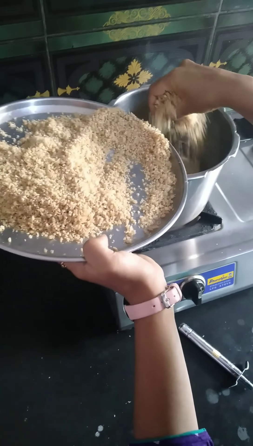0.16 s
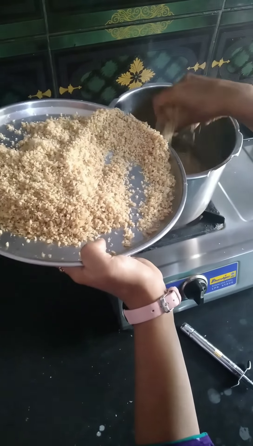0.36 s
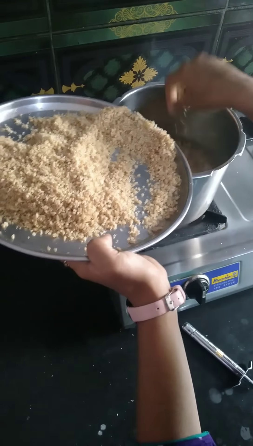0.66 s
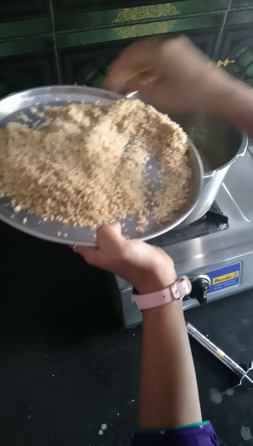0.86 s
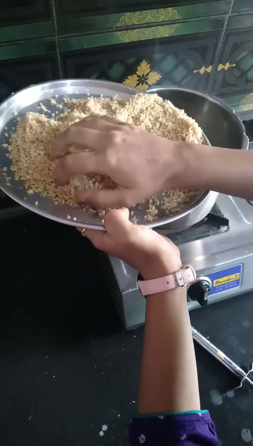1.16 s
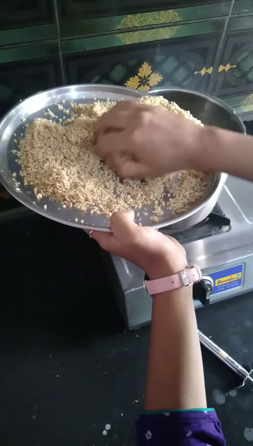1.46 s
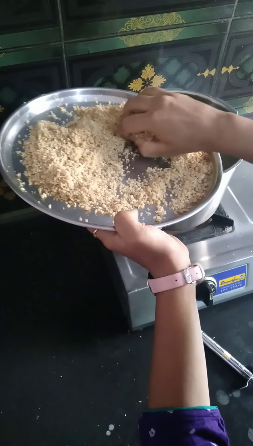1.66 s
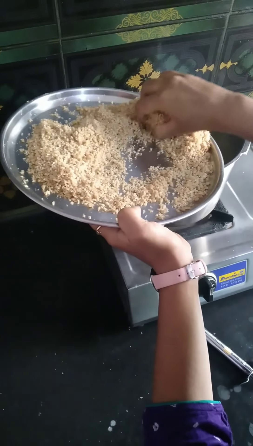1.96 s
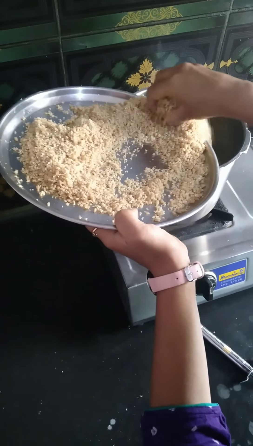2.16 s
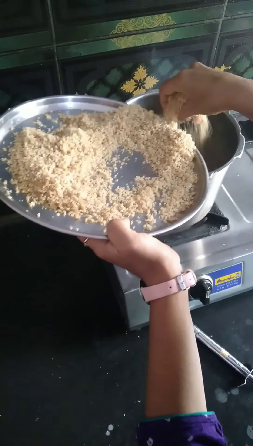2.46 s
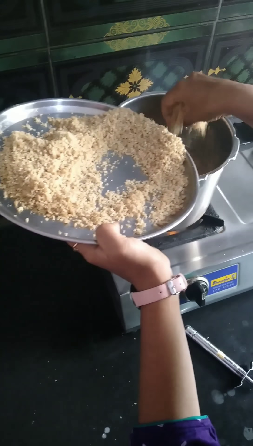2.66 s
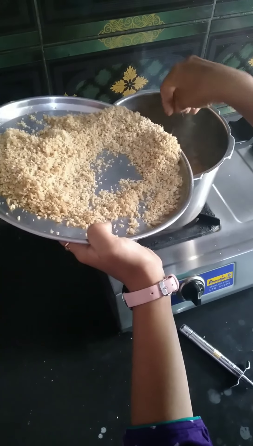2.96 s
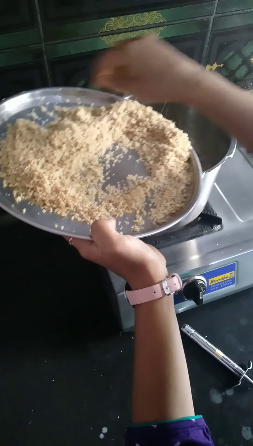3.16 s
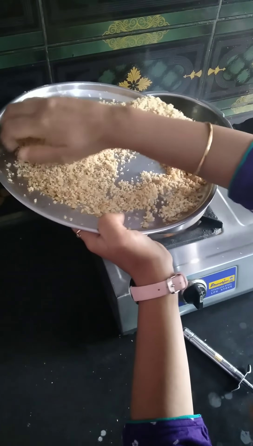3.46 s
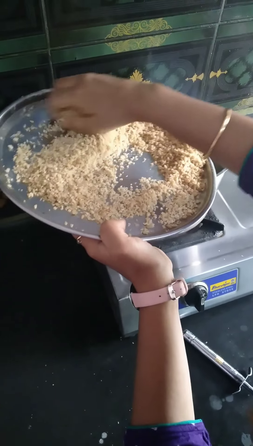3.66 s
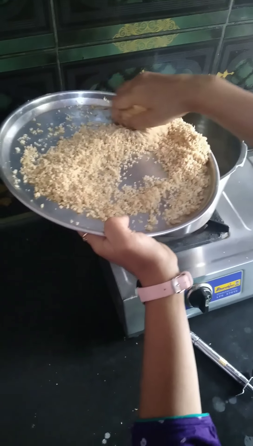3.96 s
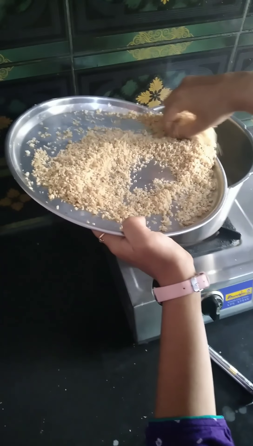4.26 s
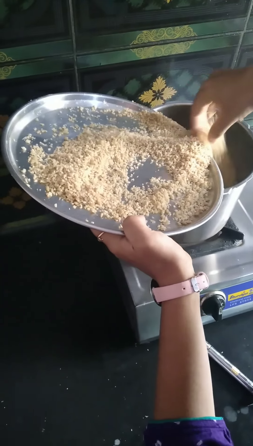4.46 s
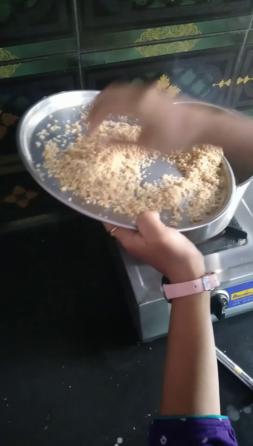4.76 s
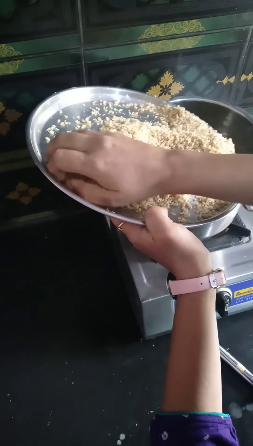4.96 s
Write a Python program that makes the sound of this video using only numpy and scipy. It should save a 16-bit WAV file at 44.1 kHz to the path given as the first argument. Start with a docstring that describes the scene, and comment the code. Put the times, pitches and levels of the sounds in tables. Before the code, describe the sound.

Gritty grain rushes and splashes into a steel pot in three bursts, with finger rakes, dull thuds and hard clanks between.

```python
"""Coarse wheat is pushed by hand off a steel plate into a cooker of warm water, in a small tiled kitchen.
0 s: first handful, random grain impacts with bubbles, then a knock; finger rakes; a deep drone until 2.3 s.
2.2 s: second handful, with plops and soft knocks; then more rakes. Faint narrow noise bands glide at times.
4.2 s: plops, the short third handful, and the hardest knocks, as decaying modes of plate and rim.
Throughout: grains shifting on the plate, a wavering hum of sines, filtered-noise rumble and hiss."""
import sys
import numpy as np
from scipy import signal
from scipy.fft import rfft, irfft
from scipy.io import wavfile

SR = 44100
rng = np.random.default_rng(int(sys.argv[2]) if len(sys.argv) > 2 else 0)


def digitize_waveform(pressure):
    """Quantize a signal to 16-bit integers and store it at the path in sys.argv[1].

    Rows of a 2-D input are taken as channels; values are limited to [-1, 1].
    """
    field = np.atleast_2d(pressure).T
    bounded = np.clip(field, -1, 1)
    quanta = np.round(bounded * 32767).astype(np.int16)
    wavfile.write(sys.argv[1], SR, quanta)


N = 225457
TIME = np.arange(N) / SR
TAIL = np.arange(SR // 2) / SR


# dry ticks of single grains: f/Hz, relative level/dB
GRAIN_SPECTRUM = [(2500, -17.5), (4500, -12.5), (6000, -7), (7300, -5), (8500, -1), (9400, -6), (10500, -9),
                  (12000, -12), (16000, -22.5)]
# duller patter of clumps: f/Hz, relative level/dB
PATTER_SPECTRUM = [(1500, -19), (2300, -6.5), (3200, -6), (4200, -3), (6000, -11), (8000, -20.5)]
# wheat hitting the water: f/Hz, relative level/dB
SPLASH_SPECTRUM = [(250, 4.5), (400, -4.5), (540, 12), (720, 3.5), (1150, 5.5), (1600, 5), (2200, -10.5),
                   (3200, -6.5)]
# clumps that drop at once: middle t/s, half length/s, relative level/dB
CLUMP_DROPS = [(0.17, 0.028, -44), (0.625, 0.092, -34), (2.25, 0.025, -30.5), (2.9, 0.066, -37),
               (4.175, 0.023, -38.5), (4.245, 0.06, -33), (4.63, 0.13, -40.5)]
# fingers raking through the heap: middle t/s, half length/s, relative level/dB
FINGER_RAKES = [(1.3, 0.065, -57), (1.563, 0.07, -45), (2.002, 0.1, -47.5), (3.655, 0.087, -46.5),
                (3.745, 0.054, -38), (3.85, 0.044, -36.5), (4.11, .025, -45), (4.006, 0.16, -48),
                (5.102, 0.051, -52)]


def wheat(shifting_db=-62.5, patters_per_tick=0.4, patter_db=-5, clump_patter_db=-3, rake_patter_db=-15,
          splash_db=-9.5, patter_waver_db=-0.9, splash_waver_db=-0.5):
    """A stronger flow brings more grains; they tick, patter in clumps, splash and trap bubbles."""
    poured = stream()
    clumps = swells(CLUMP_DROPS)
    # some grains keep shifting on the tilted plate
    raked = np.hypot(swells(FINGER_RAKES), undb(shifting_db))
    flow_db = 10 * np.log10(poured ** 2 + clumps ** 2 + raked ** 2)
    per_s = 6000 * undb(.5 * (np.minimum(flow_db, -28) + 32.5))

    # falling grains land hard; grains only pushed about lack the highest treble
    falling = np.clip((flow_db + 47.5) / 14, 0, 1)
    ticks = unit(colour(grains(per_s, 3.2), GRAIN_SPECTRUM))
    soft = signal.sosfiltfilt(signal.butter(8, 10500, fs=SR, output="sos"), ticks)
    ticks = (soft + falling * (ticks - soft)) * undb(flow_db)

    patter_power = (undb(patter_db) * poured) ** 2
    patter_power += (undb(clump_patter_db) * clumps) ** 2
    patter_power += (undb(rake_patter_db) * raked) ** 2
    patter = unit(colour(grains(per_s * patters_per_tick, 1.7), PATTER_SPECTRUM)) + undb(-10.0) * fizz()
    patter = patter * np.sqrt(patter_power) * undb(patter_waver_db * walk(33.0))

    splash = unit(colour(ports(grains(per_s, 3.7), 1100), SPLASH_SPECTRUM))
    splash = splash * np.hypot(poured, undb(-2) * clumps) * undb(splash_db + splash_waver_db * walk(27.12))
    return spurts() * (pan(ticks, -0.49) + pan(patter + splash, 1.4))


# handfuls off the plate: full flow from t/s, until t/s, relative level/dB, thinning/(dB/s)
POURED_HANDFULS = [(0.0, 0.466, -30, 6), (2.163, 2.9, -31, 6), (4.357, 4.51, -29.5, -8.5)]


def stream(rise_db_per_s=128, trail_db_per_s=78):
    """Gain of the pour: each handful starts quickly, thins (builds, if negative) and trails off."""
    out = np.zeros(N)
    for start, end, db, thinning_db_per_s in POURED_HANDFULS:
        early = np.maximum(start - TIME, 0)
        held = np.clip(TIME - start, 0, end - start)
        late = np.maximum(TIME - end, 0)
        out += undb(db - rise_db_per_s * early - thinning_db_per_s * held - trail_db_per_s * late)
    return out


def swells(rows):
    """Gain of bell-shaped swells, one per row, summed in power."""
    return np.sqrt(sum(undb(2 * db) / (1 + ((TIME - s) / half_s) ** 2 / 3) ** 4 for s, half_s, db in rows))


def grains(per_s, spread_db):
    """Random impacts of unequal size; each reaches one microphone up to 20 samples before the other."""
    at = np.flatnonzero(rng.random(N) < per_s / SR)
    sign_draw, size_draw, lag_draw = rng.random((N, 3))[at].T
    hits = np.sign(sign_draw - .5) * undb(spread_db * np.minimum(-np.log(1 - size_draw), 5))
    lag = (40 * (lag_draw - .5)).astype(int)
    out = np.zeros((2, N))
    out[0, at] = hits
    out[1, (at + lag) % N] = hits
    return unit(out / np.sqrt(per_s))  # density does not set the level


def spurts(per_s=55, t60=0.2, size=0.24):
    """Sticky grains let go in little avalanches, each with a sudden start and a quick decay."""
    starts = (rng.random(N) < per_s / SR) * np.minimum(rng.exponential(size=N), 3)
    return unit(1 + size * convolve(starts, fade(t60))[0])


def fizz(count=1500, cycles=90):
    """Small bubbles of all sizes, carried under by the grains."""
    out = np.zeros((2, N))
    for when, pitch, size, left, right in rng.random((count, 5)):
        hz = 1700 * 3 ** pitch
        sides = np.array([[left], [right]]) - .5
        add(out, when * N / SR, undb(20 * size) * sides * bubble(hz, cycles / hz))
    return unit(out)


def bubble(hz, t60, glide=0.54):
    """A trapped bubble starts within two cycles, rings and rises in pitch."""
    t = TAIL[:SR // 16]
    decay = np.exp(-np.log(1000) * t / t60)
    return np.minimum(hz * t / 2, 1) * decay * np.sin(2 * np.pi * hz * t * (1 + glide * t))


def cooker_wall(x, scatter_db=6.0, t60=0.03, count=6):
    """Sound bounces between the steep steel walls, differently for each place where the grains land."""
    shares = np.array([walk(45) for _ in range(count)])
    out = np.zeros((2, N))
    for share in shares / np.sqrt(np.sum(shares ** 2, axis=0)):
        out += convolve(x * share, unit_energy(noise(len(TAIL)) * fade(t60)))
    return (x + undb(scatter_db) * out) / np.hypot(1, undb(scatter_db))


def wall_strikes(db=-9.5):
    """A few grains of each pour strike the bare steel near the top and are heard directly."""
    strikes = unit(colour(grains(420, 1.5), GRAIN_SPECTRUM))
    return undb(db) * strikes * np.hypot(stream(), swells(CLUMP_DROPS))


def pings(count=1400, ping_hz=8500, spread_octaves=0.14, db=-7, t60=.005, spread_db=3.5):
    """Single grains tick on the steel, each at the pitch of the spot where it lands."""
    out = np.zeros((2, N))
    starts = rng.random(count) * N / SR
    draws = np.clip(rng.standard_normal((count, 4)), -1.5, 1.5)
    for s, (pitch, size, left, right) in zip(starts, draws):
        ping = bubble(ping_hz * 2 ** (spread_octaves * pitch), t60, glide=0)  # steady pitch
        add(out, s, undb(spread_db * size) * np.array([[left], [right]]) * ping)
    return undb(db) * unit(out) * np.hypot(stream(), swells(CLUMP_DROPS))


# little clumps of grains on steel: t/s, relative level/dB, contact corner f/Hz
STRAY_CLUMPS = [(0.004, -25, 14000), (0.065, -30, 14000), (0.078, -24, 14000), (0.136, -25, 12000),
                (0.308, -31, 11000), (0.598, -29, 12100), (0.609, -21.5, 14000), (.641, -25, 14000),
                (0.788, -33.5, 12000), (0.902, -51, 9500), (1.117, -25.5, 11300), (2.002, -34.5, 9500),
                (2.096, -44, 9500), (2.138, -38, 11000), (2.176, -26, 14000), (2.237, -34, 14000),
                (2.369, -33, 11000), (2.402, -25.5, 14100), (2.471, -28, 11000), (2.534, -32, 12000),
                (2.807, -38, 12000), (2.869, -45, 12000), (2.9, -23.5, 14100), (3.731, -43, 11000),
                (3.821, -30.5, 12000), (3.836, -31, 12200), (3.932, -39, 9500), (4.085, -31, 9200),
                (4.148, -32, 11800), (4.196, -27, 12000), (4.205, -33, 12000), (4.25, -39, 12100),
                (4.308, -25, 12000), (4.522, -34, 14000)]


def stray_grains(burst_s=0.0033):
    """A little clump lands within a few milliseconds, then its grains scatter over the steel."""
    out = np.zeros((2, N))
    for s, db, corner_hz in STRAY_CLUMPS:
        landing = np.exp(-2 * (TAIL / burst_s - 1) ** 2)
        sizes_db = 2.5 * np.interp(TAIL * 900, np.arange(512), rng.standard_normal(512))
        scatter = 0.3 * fade(0.27) * unit(undb(sizes_db))
        clump = unit_energy(colour(noise(len(TAIL)) * (landing + scatter), GRAIN_SPECTRUM))
        add(out, s, undb(db + 21.5) * contact(clump, corner_hz, order=6))
    return out


# clumps in the water: t/s, f/Hz at the start, relative level/dB, t60/s
WATER_PLOPS = [(0.14, 1384, -35.5, 0.13), (2.185, 1985, -24.5, 0.039), (2.246, 2570, -24, .05),
               (2.41, 1146, -34.5, 0.2), (4.198, 2150, -20, 0.043), (4.195, 2520, -25, .04),
               (4.205, 2350, -16, 0.044), (4.222, 2170, -34, .03)]


def plops():
    """Clumps trap a few larger pockets of air."""
    out = np.zeros((2, N))
    for s, hz, db, t60 in WATER_PLOPS:
        add(out, s, undb(db) * bubble(hz, t60))
    return out


# plate against cooker: t/s, relative level/dB, contact corner f/Hz (higher is harder), click level/dB re blow
RIM_KNOCKS = [(0.3767, -24.5, 1490, -26), (1.9105, -22, 2360, -13), (2.905, -42, 700, -33),
              (2.946, -34, 900, -25), (4.325, -12.5, 2900, -6), (4.611, -23.5, 1490, -9),
              (4.655, -26, 1170, -21), (4.835, -12.5, 2930, -5.5)]
# modes of plate and cooker: f/Hz, relative level/dB, t60/s
STEEL_MODES = [(222.6, -16.5, 0.56), (242, -9.5, 0.52), (464, -6, 0.62), (505.4, 6.5, 0.27), (534, 4, 0.54),
               (566.7, 7, 0.23), (698, -18, 0.57), (780, -10.5, 0.43), (883, -16, 0.69), (923, 10, 0.085),
               (1023, -10, 0.5), (1230, 1.5, 0.34), (1505, 10.5, 0.029), (1504, -11, 0.81),
               (1500, -8, 0.44), (2085, -5.5, 0.37), (2120, 5, 0.18)]
# bright modes of the rim: f/Hz, relative level/dB, t60/s
RIM_MODES = [(4200, -25, 0.26), (4330, -7, 0.76), (4530, 11, 0.33), (5006, 3, 0.26), (5840, 16, .3),
             (5900, 9, 0.24), (7570, 18, 0.21), (8430, 22, 0.2)]
# dense short modes of a blow: f/Hz, relative level/dB
THUD_SPECTRUM = [(120, -9), (240, 2), (370, -5), (520, 3.5), (680, 1), (900, -0.5), (1600, -3.5),
                 (2100, -2.5), (3200, -13), (6000, -49)]
# dense short modes of its metal click: f/Hz, relative level/dB
CLICK_SPECTRUM = [(1500, -25), (2500, -3), (3400, -9), (4300, 9), (5200, -2), (6200, 7.5), (8200, 9),
                  (10000, 2.5), (12000, -6.5), (16000, -15)]


def knocks(steel_db=20.0, thud_db=16, thud_t60=0.55, push_db=14, push_hz=560, push_t60=0.27,
           click_t60=0.11, jolt_db=15, jolt_s=0.00026):
    """Each blow jolts the plate in one quick swing, thuds and rings the steel; bare metal adds a click."""
    out = np.zeros((2, N))
    push = unit_energy(fade(push_t60) * np.sin(2 * np.pi * push_hz * TAIL))
    swing = TAIL / jolt_s - np.e
    jolt = unit_energy(-swing * np.exp(-swing ** 2 / 2))
    for s, db, corner_hz, click_db in RIM_KNOCKS:
        thud = ports(rng.standard_normal((2, len(TAIL))), 1800) * (fade(thud_t60) + 0.16 * fade(0.021))
        thud = unit_energy(colour(thud, THUD_SPECTRUM))
        body = undb(steel_db) * ring(STEEL_MODES) + undb(thud_db) * thud + undb(push_db) * push
        body = kitchen(contact(body, corner_hz), wet_db=-2.5)
        crack = noise(len(TAIL)) * (fade(0.038) + fade(click_t60) + 0.77 * fade(0.55))
        crack = unit_energy(colour(crack, CLICK_SPECTRUM))
        click = kitchen(undb(26.0) * crack + undb(19.0) * ring(RIM_MODES), wet_db=-7.5)
        add(out, s, undb(db) * (body + undb(click_db) * click + undb(jolt_db) * jolt))
    return out


def ring(modes, scatter_db=-1.0):
    """Modes start together, neighbours in opposite sense; higher ones differ in phase between microphones."""
    hz, db, t60 = np.transpose(modes)[:, :, None]
    apart = rng.uniform(-np.pi, np.pi, hz.shape) * np.minimum((hz / 1700) ** 2, 1)
    phase = 2 * np.pi * hz * TAIL + np.pi * np.arange(len(hz))[:, None]
    size = undb(db + scatter_db * rng.standard_normal(hz.shape)) * fade(t60)
    return unit_energy(np.array([np.sum(size * np.sin(phase + side * apart), axis=0) for side in (1, -1)]))


def contact(x, corner_hz, order=2):
    """A softer contact takes away the treble of a blow."""
    return signal.sosfilt(signal.butter(order, min(corner_hz, SR / 3), fs=SR, output="sos"), x)


# dull thuds of the plate, some forming the body of a knock: t/s, relative level/dB, contact corner f/Hz
PLATE_THUDS = [(.377, -35, 1400), (.402, -31.5, 1300), (1.938, -27.5, 1410), (2.326, -29, 1250),
               (2.386, -41, 1200), (2.459, -35, 1260), (2.9, -27.5, 980), (3.078, -29, 1110),
               (3.112, -40, 1190), (3.181, -33, 1250), (3.225, -40, 1100), (3.723, -27.5, 1380),
               (3.971, -35, 960), (4.566, -22, 434), (4.617, -28, 1100), (4.655, -24.5, 1270),
               (4.786, -24.5, 1300)]
# dense damped modes of the loaded plate: f/Hz, relative level/dB
LOADED_PLATE_SPECTRUM = [(120, -9), (230, 11), (400, -1), (600, 3.5), (780, 6), (1100, 1), (2000, -7)]


def plate_thuds(t60=0.48):
    """The plate, damped by the wheat on it, thuds dully as a burst of decaying low noise."""
    out = np.zeros((2, N))
    for s, db, corner_hz in PLATE_THUDS:
        thud = noise(len(TAIL)) * (fade(t60) + 0.6 * fade(0.045))
        thud = unit_energy(colour(thud, LOADED_PLATE_SPECTRUM))
        add(out, s, undb(db + 23.5) * contact(thud, corner_hz, order=4))
    return out


# lumps on the cooker's bottom: t/s, relative level/dB
BOTTOM_TAPS = [(0.519, -20.5), (.63, -19.5), (2.49, -19), (2.555, -18), (2.6, -21.5), (2.66, -18.5),
               (2.72, -21), (2.755, -22), (2.79, -22), (2.981, -18.5)]


def cooker_ring(damping=0.55):
    """Heavier lumps tap the bottom of the cooker; the water damps its low modes."""
    out = np.zeros((2, N))
    for s, db in BOTTOM_TAPS:
        damped = [(hz, mode_db, t60 * damping) for hz, mode_db, t60 in STEEL_MODES[2:10]]
        add(out, s, undb(db) * ring(damped))
    return kitchen(out, wet_db=1.5)


# grains dragged over the plate: f/Hz, relative level/dB
SCRAPE_SPECTRUM = [(1000, -10), (2500, -13), (4400, 0), (5400, -11), (8300, 7), (10000, -6), (11500, -12),
                   (16000, -16)]


def scrapes(per_s=500, jerk_per_s=60, db=-4):
    """Grains under the fingers stick and slip across the plate in short jerks."""
    jerks = unit(undb(5 * np.clip(walk(jerk_per_s), -1.5, 1.5)))
    slips = unit(colour(grains(per_s, 2.0), SCRAPE_SPECTRUM))
    return undb(db) * slips * jerks * swells(FINGER_RAKES)


# narrow noise bands: start t/s, end t/s, start f/Hz, end f/Hz, half width/Hz, relative level/dB
GLIDING_BANDS = [(0.867, 1.28, 1610, 1563, 278, -51.5), (1.149, 1.674, 2980, 3440, 327, -55),
                 (1.307, 1.8, 3660, 3780, 278, -55.5), (1.498, 1.683, 1770, 1975, 280, -56),
                 (1.446, 1.805, 3980, 4080, 110, -52), (1.659, 1.936, 2445, 1596, 322, -53),
                 (1.8, 2.098, 2555, 2636, 230, -46.5), (1.99, 2.154, 4480, 4000, 300, -43.5),
                 (1.742, 2.037, 3690, 4100, 333, -53), (2.116, 2.214, 2534, 1623, 300, -44.5),
                 (2.174, 2.302, 2220, 2010, 450, -51), (3.2, 3.582, 1568, 1595, 212, -52),
                 (3.447, 3.684, 1473, 1412, 282, -55.5), (4.007, 4.224, 1448, 1620, 244, -54.5),
                 (4.196, 4.281, 2500, 2095, 485, -41)]


def gliding_bands(uneven_db=2.5, uneven_per_s=70):
    """Narrow bands of faint noise swell and glide, with an uneven level."""
    out = np.zeros((2, N))
    for start, end, from_hz, to_hz, width_hz, db in GLIDING_BANDS:
        lowpass = signal.butter(5, width_hz, fs=SR, output="sos")
        slow = unit(signal.sosfilt(lowpass, rng.standard_normal((2, 2, SR))))
        progress = np.linspace(0, 1, int((end - start) * SR))
        phase = 2 * np.pi * np.cumsum(from_hz + (to_hz - from_hz) * progress) / SR
        band = slow[0, :, :len(phase)] * np.cos(phase) + slow[1, :, :len(phase)] * np.sin(phase)
        add(out, start, undb(db) * np.sin(np.pi * progress) * band)
    return out * unit(undb(uneven_db * walk(uneven_per_s)))


def kitchen(x, wet_db, t60=0.18):
    """Tiled walls return a short diffuse tail."""
    tail = noise(len(TAIL)) * fade(t60) * np.clip(TAIL / 0.00018 - .5, 0, 1)
    return x + undb(wet_db) * convolve(x, unit_energy(tail))


# lines of the hum: f/Hz, relative level/dB, wavering share, fading/(dB/s)
HUM_LINES = [(50.3, -61.5, 0.11, 0), (102.5, -52, 0.57, 1.5), (147.3, -55.5, 1, 4.5), (229, -61, 0.25, 0.5),
             (345, -62.5, 0.48, 1.6)]
# deep drone, dipping and rising again, then gone by 2.3 s: t/s, relative level/dB
DRONE_COURSE = [(0, -49), (0.55, -53), (1.4, -49.5), (1.9, -47.5), (2.3, -69), (5.11, -74)]
# low room noise: f/Hz, relative level/dB
RUMBLE_SPECTRUM = [(20, -50), (45, 8), (75, -5), (110, 7), (170, -1.5), (260, -7.5), (400, -7), (550, -6),
                   (700, -28), (1200, -14), (2200, -94), (5000, -63)]
# faint hiss: f/Hz, relative level/dB
HISS_SPECTRUM = [(2000, -15), (4200, -92), (4650, 16.5), (5100, -76), (6500, 4.5), (7700, 15.5), (8800, 18),
                 (10500, 13.5), (11300, -69), (16000, -80)]


def background(left_db=2.0, drone_hz=61.7):
    """Wavering hum and a deep drone as sines, low room rumble and a thin hiss as filtered noise."""
    hum = np.zeros(N)
    for hz, db, waver, fading_db_per_s in HUM_LINES:
        level = undb(db - fading_db_per_s * TIME) * (1 + waver * walk(7.8))
        hum += level * np.sin(2 * np.pi * hz * TIME + 1.47 * waver * walk(9))
    drone = undb(np.interp(TIME, *np.transpose(DRONE_COURSE))) * np.sin(2 * np.pi * drone_hz * TIME)
    rumble = undb(-48.0) * unit(colour(noise(N), RUMBLE_SPECTRUM))
    hiss = undb(-48.0) * unit(colour(noise(N), HISS_SPECTRUM))
    return pan(np.sqrt(2) * (hum + drone) + rumble, left_db) + hiss


def undb(db):
    """Decibels to gain."""
    return 10 ** (np.asarray(db) / 20)


def unit(x):
    """Scale to rms 1."""
    return x / np.sqrt(np.mean(x ** 2))


def unit_energy(x):
    """Scale each channel of a response to energy 1."""
    return x / np.sqrt(np.sum(x ** 2, axis=-1, keepdims=True))


def colour(x, points):
    """Causal minimum-phase filter through (Hz, dB) points, built from the cepstrum."""
    size = 4096
    hz, db = np.transpose(points)
    gain_db = np.interp(np.log(np.arange(size // 2 + 1) * SR / size + 1), np.log(hz), db)
    cepstrum = irfft(np.log(undb(gain_db)))
    cepstrum[1:size // 2] *= 2
    cepstrum[size // 2 + 1:] = 0
    return convolve(x, irfft(np.exp(rfft(cepstrum))))


def convolve(x, response):
    """Pass a sound through a response, keeping its length."""
    return signal.oaconvolve(np.atleast_2d(x), np.atleast_2d(response), axes=-1)[:, :x.shape[-1]]


def fade(t60):
    """Half a second of exponential decay."""
    return np.exp(-np.log(1000) * TAIL / t60)


def walk(rate):
    """Random course with a spread near 1, through a new value `rate` times a second."""
    knots = rng.standard_normal(1024)
    return np.interp(TIME * rate, np.arange(len(knots)), knots)


def add(out, s, sound):
    """Mix a sound in at time s."""
    i = max(int(s * SR), 0)
    out[:, i:i + sound.shape[-1]] += sound[..., :N - i]


def pan(x, left_db):
    """Lean a sound to the left by a level difference."""
    return x * undb(np.array([[left_db], [-left_db]]) / 2)


def ports(pair, split_hz=900):
    """Two unrelated sounds as two microphones hear them: more alike in the bass than above."""
    side = signal.sosfilt(signal.butter(1, split_hz, "high", fs=SR, output="sos"), pair[1])
    side = .7 * side + .3 * pair[1]
    return np.array([pair[0] + side, pair[0] - side]) / np.sqrt(2)


def noise(size):
    """Diffuse stereo noise."""
    return ports(rng.standard_normal((2, size)))


def scene():
    """Wheat falls deep in the cooker and is heard more by reflection than the knocks on the rim."""
    inside = kitchen(undb(-4.5) * cooker_wall(wheat()), wet_db=-2.5)
    near = stray_grains() + plops() + wall_strikes() + pings() + scrapes() + gliding_bands()
    near = kitchen(near, wet_db=-10)
    return inside + near + knocks() + kitchen(plate_thuds(), wet_db=1.5) + cooker_ring() + background()


def record(dry, lag_samples=9, top_hz=16200):
    """The left microphone hears everything a little later; a steep low-pass cuts the top."""
    pair = np.array([np.pad(dry[0], (lag_samples, 0))[:N], dry[1]])
    return signal.sosfilt(signal.ellip(10, .2, 70, top_hz, fs=SR, output="sos"), pair)


dry = scene()
out = record(dry)
digitize_waveform(out)
```